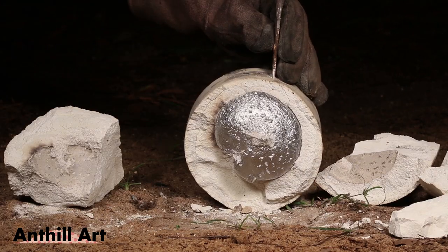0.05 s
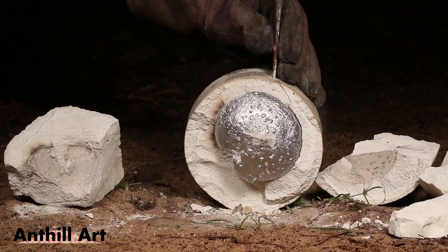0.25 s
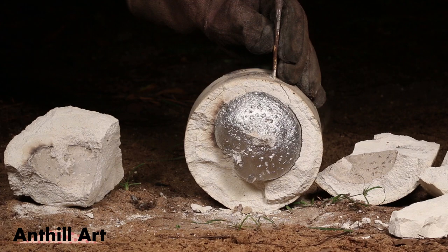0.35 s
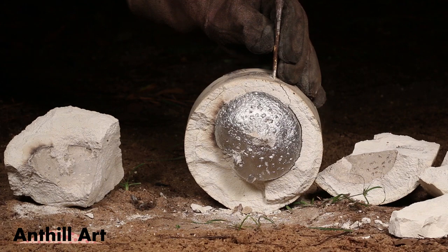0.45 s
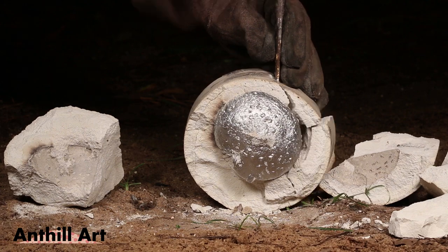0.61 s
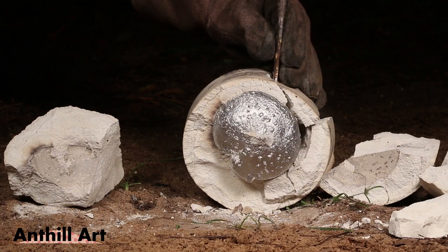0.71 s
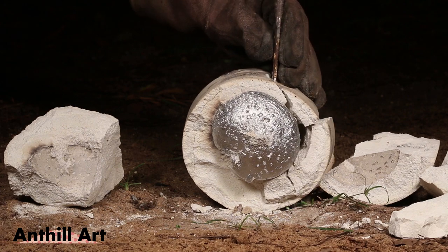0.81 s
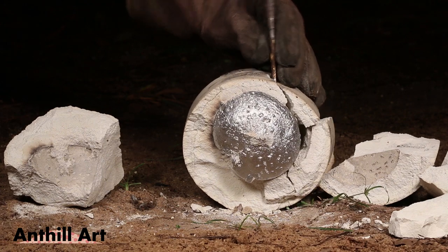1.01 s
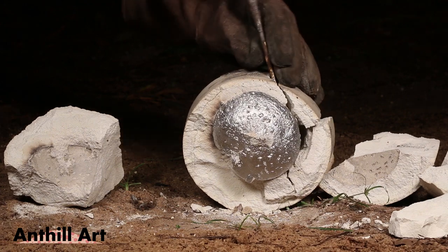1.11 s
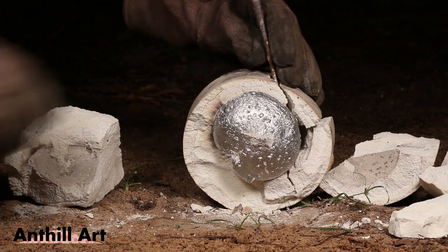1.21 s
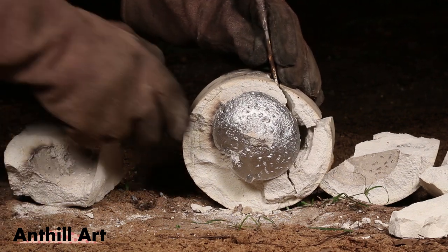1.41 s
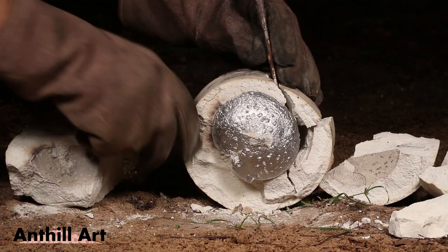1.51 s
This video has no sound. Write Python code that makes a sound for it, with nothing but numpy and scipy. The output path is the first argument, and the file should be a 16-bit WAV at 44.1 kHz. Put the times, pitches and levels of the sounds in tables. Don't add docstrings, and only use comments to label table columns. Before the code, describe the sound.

Hammer blows on a steel chisel break a plaster mould on soil. At 0.22 s a hard, dry crack clips the nearly mono microphone, with two quick bounces and a low, sagging ground thud. A second, slightly harder and brighter blow follows at 0.65 s. Short ringing and gritty crumbling fade into night air, trilling crickets and a faint distant motor until about 1.5 s, with a faint soft bump near 1.23 s.

```python
import sys
import numpy as np
from scipy import signal
from scipy.io import wavfile

SR = 44100
rng = np.random.default_rng(int(sys.argv[2]) if len(sys.argv) > 2 else 0)


def how_loud(loudness_db):
    steps = np.asarray(loudness_db, float) / 20
    return 10 ** steps


def unload_audio(sound):
    columns = np.transpose(np.atleast_2d(sound))
    steps = np.round(np.clip(columns, -1, 1) * 32767)
    wavfile.write(sys.argv[1], SR, steps.astype(np.int16))


N = 68355

# (frequency [Hz], level per Hz [dB])
AIR = [(30, -12), (60, -8.5), (200, -9), (400, -19.5), (1000, -19), (1800, -27.5), (4500, -22.5),
       (9000, -37)]
# (frequency [Hz], rms level [dB], width [Hz])
MOTOR = [(61.5, -40.5, 4.6), (72.8, -47, 9.9), (123, -46, 18), (184.3, -42, 7), (229, -55, 18),
         (276.5, -57, 5.6), (334.4, -60.5, 13.5)]
# (centre [Hz], pitch spread [Hz], level [dB], pulse rate [1/s], share of blur [0-1])
CHOIRS = [(2280, 140, -51, 63, 0.04), (3410, 110, -46.5, 52, 1), (3796, 110, -44.5, 36, 0.96),
          (4870, 180, -57.5, 26, .5), (5980, 41, -43, 70, 0), (6196, 150, -32.5, 51, 0.68),
          (6480, 70, -36.5, 24, 0.76), (7195, 200, -42, 130, 0.3), (7560, 450, -50, 64, 1)]
# (time [s], level [dB])
NEAR_CRICKET = [(0.169, -85), (.195, -34), (.3, -31), (.36, -40), (.41, -35.5), (.5, -44.5), (.6, -47.5),
                (.72, -45), (.9, -58), (1.25, -57), (1.4, -76)]
# (time [s], level [dB])
LOWER_CRICKET = [(0, -54), (.19, -46), (.3, -50), (.45, -56), (.53, -45), (.63, -45), (.72, -52), (.8, -45),
                 (.88, -47), (.98, -50), (1.15, -42), (1.21, -52), (1.28, -42), (1.36, -52), (1.55, -47)]
CONTACT_S = [
    .2207,
    .2353,
    .2489,
    .6492,
    .6639,
    .6726,
]
# (level [dB], brightness [dB], ground shake [dB])
BLOWS = [
    (9, -0.2, 0.5),
    (-5.5, 10, -55),
    (-13, -21, -43),
    (11, 1.3, -4.5),
    (-6, 8.5, -36),
    (-17, -24, -29),
]
# (start pitch [Hz], sag [Hz/s], peak level [dB], peak delay [s], build-up power, suddenness of the end)
GROUND_WAVES = [(325.5, 460, -6, .012, 4.5, 1.3), (212.6, 66, -21, 0.015, 0.99, 1.05),
                (154.5, 450, -10, 0.016, 0.9, 1), (103, 17, -16.5, 0.022, 2.1, 1.24),
                (71.1, 13, -14, 0.084, 1.06, 2.5)]
SECOND_THUD_DB = [-4.0, 3, 1.3, -1, -2]
# (frequency [Hz], level [dB], t60 [s])
MODES = [(405.5, -14.5, 0.049), (566, -5, 0.022), (764, -3.5, 0.023), (893, -3.5, 0.026), (994, -9, 0.038),
         (1113, -7.5, 0.02), (1358, -9.5, 0.031), (1580, -4, 0.017), (2014, -5, 0.026), (2528, -11, 0.028),
         (3530, -25, 0.032), (3760, -17, 0.035), (4410, -16, 0.026), (5115, -11, 0.022)]
# (frequency [Hz], level per Hz [dB], t60 [s])
TAIL = [(148, 9, 0.17), (300, 1, 0.13), (556, 1, .14), (1310, -4, 0.18), (2970, -7, 0.19),
        (4800, -6.5, 0.13), (9700, -23, 0.22), (12900, -45, 0.13)]


def rms_one(x):
    return x / np.sqrt(np.mean(x ** 2) + 1e-20)


def drift(rate):
    step = 40
    r = np.exp(-2 * step * np.pi * rate / SR)
    slow = signal.lfilter([1], [1, -2 * r, r * r], rng.standard_normal(N // step + 2002))[2000:]
    return np.interp(np.arange(N) / step, np.arange(len(slow)), rms_one(slow))


def ring(x, hz, t60):
    r, w = how_loud(-60 / (t60 * SR)), 2 * np.pi * hz / SR
    return signal.lfilter([0, np.sin(w)], [1, -2 * r * np.cos(w), r * r], x + 1e-18)


def narrow(hz, width_hz):
    x = rng.standard_normal(N + SR)
    for _ in range(3):
        x = ring(x, hz, 1.1 / width_hz)
    return rms_one(x[SR:])


def bandpass(low_hz, high_hz, order, x):
    return signal.sosfilt(signal.butter(order, [low_hz, high_hz], "band", fs=SR, output="sos"), x)


def bands(low_hz, count):
    edges = low_hz * 2 ** (np.arange(count + 1) / 2)
    for low, high in zip(edges, edges[1:]):
        noise = rng.standard_normal(N + 8000)
        yield np.sqrt(low * high), bandpass(low, min(high, .45 * SR), 2, noise)[8000:]


def at_hz(table, hz, column=1):
    table = np.array(table)
    return np.interp(np.log(hz), np.log(table[:, 0]), table[:, column])


def over_time(table):
    return how_loud(np.interp(np.arange(N) / SR, *np.transpose(table)))


def clicks(db):
    out = np.zeros(N)
    out[(np.array(CONTACT_S) * SR).astype(int)] = how_loud(db)
    return out


def decays(db, t60):
    return signal.lfilter([1], [1, -how_loud(-60 / (t60 * SR))], clicks(db) + 1e-18)


def night_air():
    layers = [how_loud(at_hz(AIR, hz) + drift(1.7)) * noise for hz, noise in bands(22.64, count=18)]
    return how_loud(-39.5) * rms_one(sum(layers))


def far_motor():
    return sum(how_loud(db) * narrow(hz, width_hz) for hz, db, width_hz in MOTOR)


def soil_bump():
    bump_s, length_s, bump_hz = 1.23, .025, 68.5
    t = np.arange(N) / SR
    swell = np.exp(-((t - bump_s) / length_s) ** 2)
    return how_loud(-37) * swell * np.sin(2 * np.pi * bump_hz * t)


def trill(hz, rate, wobble_hz, uneven_db, wander_hz=0):
    beat = np.cumsum(rate * (1 + 0.1062 * drift(10.86))) / SR + rng.random()
    pitch = hz + wobble_hz * drift(24.9) + wander_hz * drift(3)
    tone = np.sin(2 * np.pi * np.cumsum(pitch) / SR)
    return rms_one(np.sin(np.pi * beat) ** 2 * how_loud(uneven_db * drift(39)) * tone)


def cricket_choirs():
    singers, sway_db = 7, 1.2
    out = np.zeros(N)
    for hz, spread_hz, db, rate, blur in CHOIRS:
        places = np.linspace(-1.3, 1.3, singers) + rng.uniform(-0.22, .2, singers)
        voices = rms_one(sum(trill(hz + spread_hz * place, rate * rng.uniform(1.0, 1.2),
                                   wobble_hz=15.03, uneven_db=3, wander_hz=25) for place in places))
        choir = np.sqrt(1 - blur) * voices + np.sqrt(blur) * narrow(hz, 2 * spread_hz)
        out += how_loud(db + sway_db * drift(9)) * choir
    return out


def near_crickets():
    near_hz, lower_hz, haze = 5090, 3380, .8
    near = trill(near_hz, 49, wobble_hz=30, uneven_db=3) + haze * narrow(near_hz, 160)
    lower = trill(lower_hz, 59, wobble_hz=30, uneven_db=3) + haze * narrow(lower_hz, 80)
    return over_time(NEAR_CRICKET) * near + how_loud(-1) * over_time(LOWER_CRICKET) * rms_one(lower)


def ground():
    out = np.zeros(N)
    for s, (_, _, shake_db) in zip(CONTACT_S, BLOWS):
        t = np.maximum(np.arange(N) / SR - s, 0)
        for (hz, sag, peak_db, peak_s, power, end), second_db in zip(GROUND_WAVES, SECOND_THUD_DB):
            swell = (t / peak_s * np.exp((1 - (t / peak_s) ** end) / end)) ** power
            wave = np.sin(2 * np.pi * (hz - sag * t / 2) * t)
            out += how_loud(peak_db + shake_db + second_db * (s > .5)) * swell * wave
    return out


def crumbling_tail():
    rise_s, late_db, late_stretch = 0.0013, -11, 2.92
    db = np.transpose(BLOWS)[0]
    r = np.exp(-1 / (rise_s * SR))
    grit = how_loud(1.5 * drift(250))
    out = np.zeros(N)
    for hz, noise in bands(133, count=14):
        level_db, t60 = db - 15 + at_hz(TAIL, hz), at_hz(TAIL, hz, column=2)
        fall = decays(level_db, t60) + decays(level_db + late_db, late_stretch * t60)
        out += grit * noise * signal.lfilter([1 - r], [1, -r], fall)
    return out


def crack():
    db, bright_db, _ = np.transpose(BLOWS)
    burst = bandpass(740, 4300, 1, rng.standard_normal(N))
    tick = bandpass(3000, 11000, 1, rng.standard_normal(N))
    out = decays(db + bright_db - 2.5, t60=0.02) * burst
    return out + decays(db + bright_db - 33, t60=0.0035) * tick


def mould_and_chisel():
    bright_above_hz, spread_db = 3000, 0.5
    db, bright_db, _ = np.transpose(BLOWS)
    out = np.zeros(N)
    for k, (hz, level_db, t60) in enumerate(MODES):
        luck_db = spread_db * rng.standard_normal(len(db))
        hit = clicks(db + level_db + luck_db + bright_db * (hz > bright_above_hz))
        out += (-1) ** k * ring(hit, hz, t60)
    return out


def scene():
    background = night_air() + far_motor() + soil_bump() + cricket_choirs() + near_crickets()
    blows = ground() + crumbling_tail() + crack() + mould_and_chisel()
    return np.tile(background + blows, (2, 1))


def low_pass(x):
    return signal.sosfilt(signal.butter(12, 20000, fs=SR, output="sos"), x)


def record(dry):
    low_cut_hz, top_cut_hz, mismatch_s = 48, 16100, .0004
    dry = signal.sosfilt(signal.butter(3, low_cut_hz, "high", fs=SR, output="sos"), dry)
    alike, own = rng.standard_normal((1, N)), rng.standard_normal((2, N))
    own = own + 1.35 * signal.lfilter(*signal.butter(1, 477, fs=SR), own)
    wet = np.clip(dry + how_loud(-49.5) * (.35 * alike + own), -1, 1)
    wet += how_loud(-43) * np.roll(wet, int(mismatch_s * SR), axis=1) * [[1], [-1]]
    wet = signal.sosfilt(signal.cheby2(20, 70, top_cut_hz, fs=SR, output="sos"), wet)
    return low_pass(np.clip(how_loud(.1) * wet, -1, 1))


dry = scene()
out = record(dry)
unload_audio(out)
```